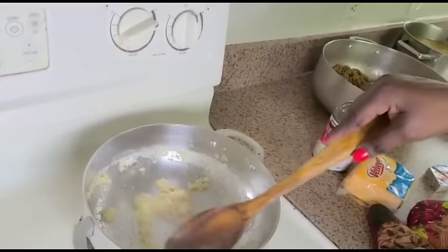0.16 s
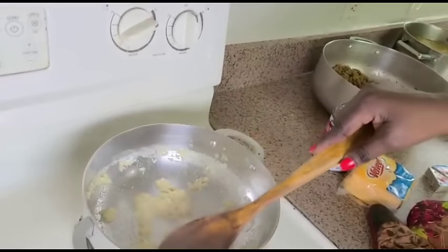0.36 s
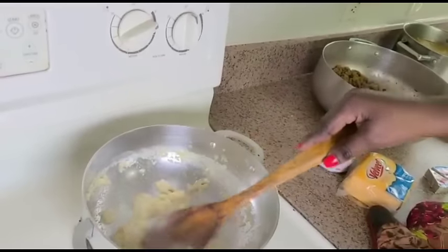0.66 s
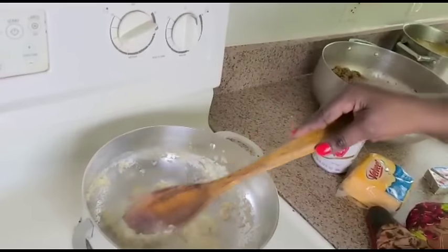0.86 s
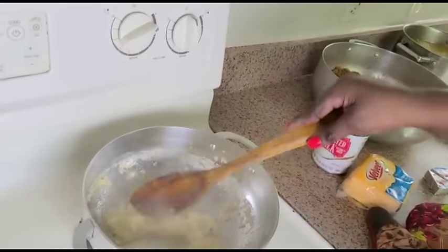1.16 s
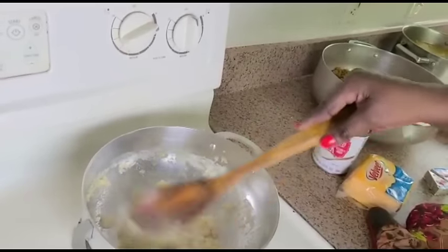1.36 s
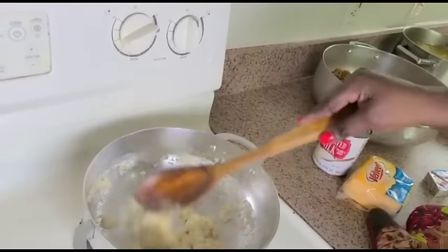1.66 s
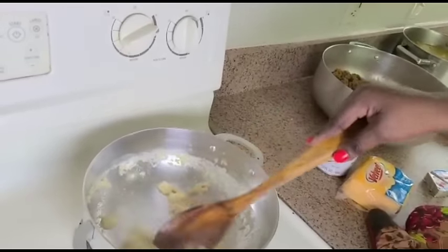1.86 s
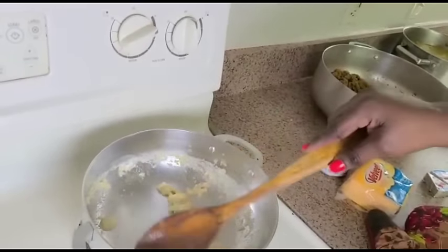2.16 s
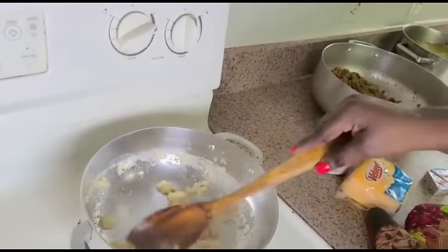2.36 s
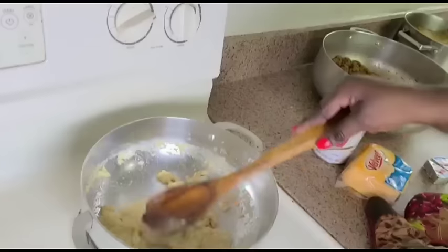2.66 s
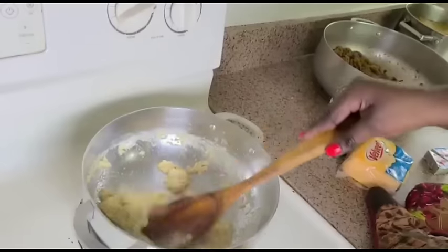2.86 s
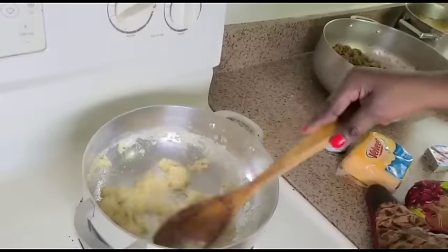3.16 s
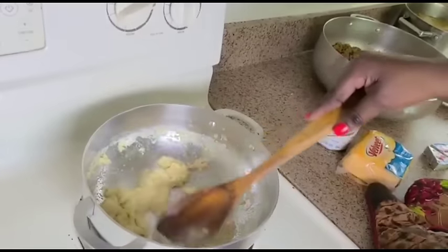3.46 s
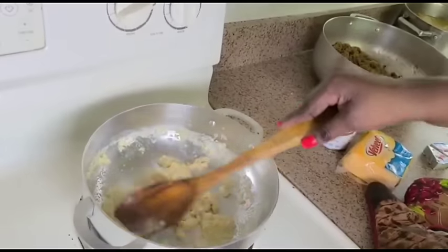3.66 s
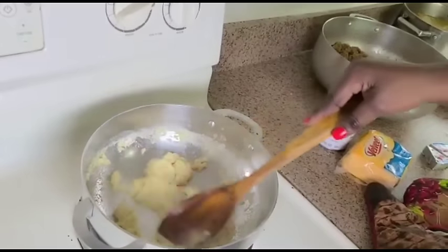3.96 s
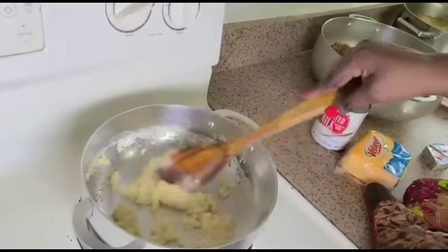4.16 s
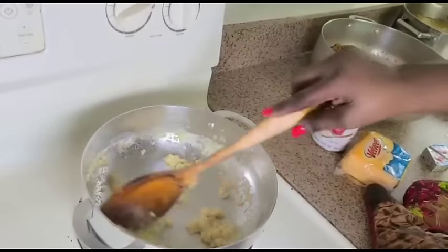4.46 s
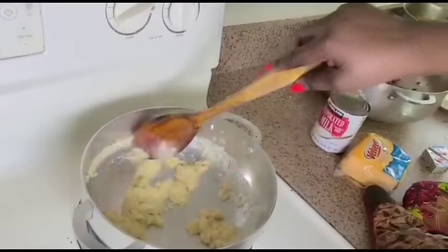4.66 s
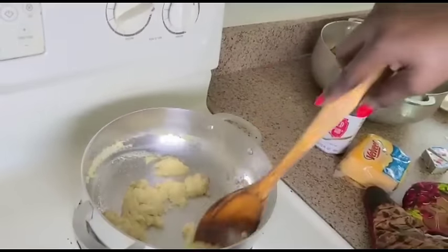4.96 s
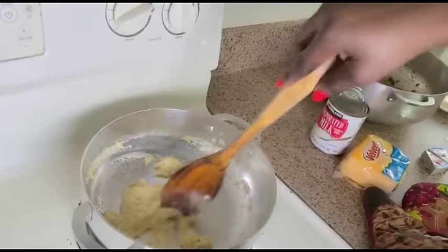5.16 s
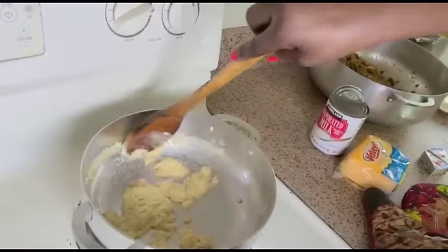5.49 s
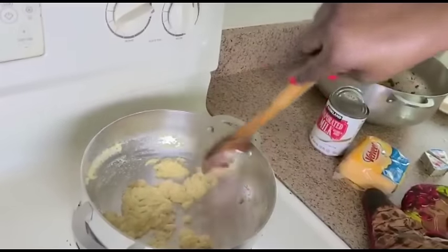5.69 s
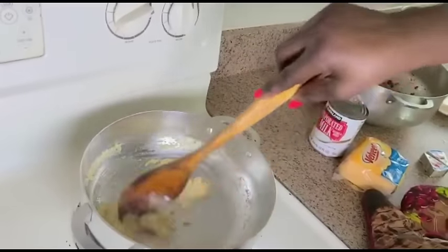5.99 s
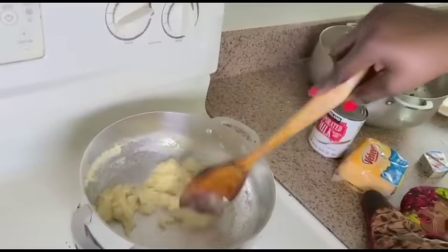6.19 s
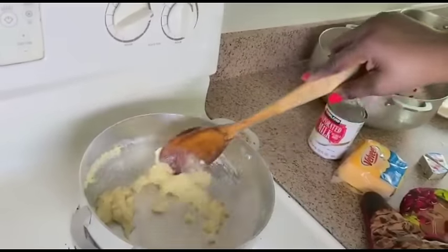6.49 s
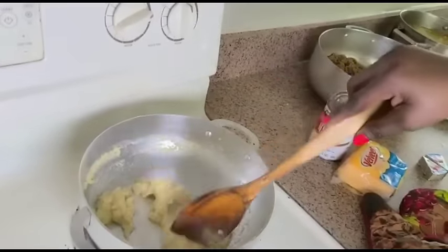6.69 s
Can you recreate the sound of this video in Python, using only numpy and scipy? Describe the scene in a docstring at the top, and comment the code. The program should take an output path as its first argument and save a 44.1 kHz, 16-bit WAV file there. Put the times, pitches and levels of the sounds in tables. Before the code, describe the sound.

From the start, a wooden spoon stirs butter and flour in a metal pot close by. Each stroke scrapes into a dull double knock with a short metallic ring, about three a second, strongest from 1.5 to 3 seconds. The pot clatters on its burner and the stove top gives low thumps, most clearly around 2.7 seconds. Soft rubbing of paste, a faint rumble and a gentle, spitting sizzle continue underneath. From about 3.2 seconds sharper clacks on the pot wall join in, and the sizzle swells and flares with the strokes. After 4.2 seconds the knocks become sparse and light. Hard, ringing clacks land at about 4.9 and 5.3 seconds, and at the second one the sizzle abruptly drops. A few faint taps follow, the sizzle recovers around 6.2 seconds, and one more clack sounds near 6.7 seconds.

```python
"""Stirring butter and flour in a pot

A wooden spoon knocks on the bottom of a metal pot, which clatters on its burner, and clacks on the wall.
Each impact excites the pot's damped modes, and the stove top thumps as the pot rocks.
Bursting bubbles make the fat sizzle and flare with the strokes; its heard level ducks abruptly at a
hard clack, then recovers. Friction adds rubbing and scraping, and the stove rumbles softly below."""
import sys
import numpy as np
from scipy import signal
from scipy.fft import rfft, irfft, next_fast_len
from scipy.io import wavfile
from scipy.ndimage import uniform_filter1d

SR = 44100
rng = np.random.default_rng(int(sys.argv[2]) if len(sys.argv) > 2 else 0)


def log_audio(samples):
    """Write samples as a 16-bit WAV file to the path given in sys.argv[1]."""
    # one column per channel
    frames = np.atleast_2d(samples).T
    # limit to full scale, then quantise
    limited = np.clip(frames, -1, 1)
    pcm = np.round(limited * 32767).astype(np.int16)
    wavfile.write(sys.argv[1], SR, pcm)


N = 301203

# each stroke scrapes, then knocks twice on the bottom: start_s, first_knock_db, gap_s, second_knock_db,
# rise_s, favoured_hz, brightness_db, after_ring_db, scrape_db
STROKES = [(.083, -13.5, 0.0082, -7, 0.00073, 503, -6, -2, -38),
           (.679, -13.5, .032, -13, 0.0027, 382, -7, 0, -34.5),
           (.950, -13, 0.012, -6.5, 0.002, 830, -0.5, -1, -34.5),
           (.996, -16.5, 0.013, -15, 0.0013, 865, 9.5, -6, -29.5),
           (1.210, -16, 0.026, -12, 0.0018, 473, -9, -0.5, -37),
           (1.502, -8.5, .009, -8, 0.00069, 500, -12, 0.5, -32),
           (1.773, -8, .012, -6.5, 0.0025, 750, 3, -4, -34),
           (2.05, -10, 0.0056, -3, 0.0016, 490, 1, -2, -35.5),
           (2.348, -14.5, .008, -23, 0.0012, 486, -19, -0.5, -43),
           (2.629, -8, .011, -10, 0.0021, 1990, -1, -1, -31),
           (2.677, -14, .054, -27, .002, 497, -14, -3.5, -48),
           (2.904, -10, .041, -11.5, 0.0031, 487, 5.5, -1.5, -31),
           (3.116, -13, 0.0067, -14, 0.0019, 460, -15, -2, -44),
           (3.347, -24.5, .028, -21.5, 0.0011, 480, 2.5, 8.5, -36),
           (3.429, -19.5, .012, -20.5, 0.014, 490, -17, 8, -42),
           (3.682, -13.5, 0.023, -13.5, 0.0027, 480, 1.5, 4, -36),
           (4.170, -15.5, .019, -20.5, 0.00098, 480, -5, 1.5, -30),
           (4.854, -20.5, 0.017, -25, 0.0051, 740, -8, 3.5, -42),
           (5.759, -26, 0.023, -21, 0.0044, 440, -4, 3.5, -52),
           (6.005, -24.5, .047, -29, 0.0013, 1980, -4, 6, -54),
           (6.635, -23, 0.017, -36, 0.0088, 472, -1, 8.5, -54)]
# dull clatter of wood, pot and stove top: frequency_hz, density_db
CLATTER_SPECTRUM = [(100, -25), (180, -4.5), (290, -14.5), (400, -3.5), (490, -3), (610, -4), (780, -4.5),
                    (980, -12), (1500, -11), (2050, -6.5), (2600, -13.5), (5000, -17), (7000, -28.5),
                    (15000, -77)]
# resonances of the pot bottom, damped by the paste: centre_hz, width_hz, gain_db
BOTTOM_RESONANCES = [(472, 66, 2.5), (752, 47, 2.5), (842, 25, 8.5), (1144, 140, 6), (1680, 69, 5),
                     (2040, 130, 1.5), (2890, 110, 7)]
# stereo balance of the knocks: frequency_hz, left_minus_right_db
KNOCK_BALANCE = [(200, 2), (480, 0), (800, -3), (1400, -4), (2100, -7.5), (4500, -12)]


def knocks(hit_db=-1.5, hit_t60=0.051, clatter_db=-12, clatter_t60=0.38, ring_db=-17, bright_hz=1800):
    """Cushioned impact: the paste softens each knock; pot, burner and stove top rattle on after it."""
    t = np.arange(SR // 2) / SR
    rattle, ring = np.zeros((2, 2, N))
    mode_hz, bottom_db, _, _ = np.transpose(POT_MODES)
    treble = signal.butter(1, bright_hz, "high", fs=SR)
    for start_s, first_db, gap_s, second_db, rise_s, favoured_hz, bright_db, after_db, _ in STROKES:
        spot = signal.iirpeak(favoured_hz, Q=13.5, fs=SR)  # the spot struck lifts one resonance
        levels_db = ring_db + after_db + bottom_db + bright_db * (mode_hz > bright_hz)
        for knock_s, level_db in (start_s, first_db), (start_s + gap_s, second_db):
            force = from_db(level_db) * onset(t, rise_s)
            hit = noise_burst(t, hit_db, hit_t60, side_db=-25)
            clatter = noise_burst(t, clatter_db + after_db, clatter_t60, side_db=-7)
            knock = band_gain(force * (hit + clatter), treble, bright_db)
            add(rattle, knock_s, band_gain(knock, spot, gain_db=6))
            add(ring, knock_s, force * pot_ring(t, levels_db, uneven_db=4))
    return panned(coloured(rattle, CLATTER_SPECTRUM, BOTTOM_RESONANCES) + ring, KNOCK_BALANCE)


# clacks of the spoon on the wall; the rows at 3.349 s and 5.759 s instead add crack and ring to the knocks # on
# the bottom at those times: start_s, level_db, rise_s, lowest_ring_hz, highest_ring_hz, free_ring_db, crack_db
CLACKS = [(1.387, -28.5, 0.00079, 1200, 2200, -10, 7), (3.231, -18.5, 0.0017, 2050, 2180, -19, 0),
          (3.349, -17, .0005, 1000, 1500, -16, -11), (3.804, -25.5, .0015, 1890, 2900, -1.5, 6),
          (4.909, -14, 0.0035, 880, 3500, -11.5, 8), (4.918, -11, .0011, 1850, 2400, -10, -6.5),
          (5.329, -14.5, 0.00071, 1880, 3900, -5, 5), (5.381, -25, 0.0012, 600, 2300, 1, 4.5),
          (5.759, -34.5, .003, 440, 905, 8, 4), (6.671, -15.5, 0.00085, 1320, 2250, -14, 5)]
# crack of bare wood on metal: frequency_hz, density_db
CRACK_SPECTRUM = [(200, -26), (600, -21), (1000, 3), (1500, -3), (2500, -4.5), (3700, 0.5), (5000, -5.5),
                  (6700, -5), (9000, -21), (15000, -17)]


def clacks(crack_t60=0.045, held_t60=0.065, buzz_t60=0.3, rolloff_db_per_octave=16, pan_db=-1.5):
    """Contact damping: wood cracks on the wall and chokes its ring; a free ring and a buzz linger."""
    t = np.arange(SR // 2) / SR
    crack, ring, buzz = np.zeros((3, 2, N))
    mode_hz, _, wall_db, _ = np.transpose(POT_MODES)
    for start_s, level_db, rise_s, low_hz, high_hz, free_db, crack_db in CLACKS:
        force = from_db(level_db) * onset(t, rise_s)
        # the place struck and the hardness of the contact favour one range of modes
        octaves_outside = np.abs(np.log2(mode_hz / np.clip(mode_hz, low_hz, high_hz)))
        levels_db = wall_db - rolloff_db_per_octave * octaves_outside
        choke = decay(t, held_t60) + from_db(free_db)
        add(ring, start_s, force * choke * pot_ring(t, levels_db, uneven_db=1.3))
        add(crack, start_s, force * noise_burst(t, crack_db - 2, crack_t60, side_db=1.5))
        add(buzz, start_s, force * noise_burst(t, crack_db + free_db - 9, buzz_t60, side_db=1))
    crack = coloured(crack, CRACK_SPECTRUM)
    buzz = coloured(buzz, SCRAPE_SPECTRUM, CAVITY_RESONANCES)
    return (crack + buzz + ring) * from_db([[pan_db], [-pan_db]])


# natural modes of the pot: pitch_hz, bottom_struck_db, wall_struck_db, t60_s
POT_MODES = [(373, -12.5, -27.5, 0.58), (446, -12, -1.5, 0.64), (495, -5.5, -9, 0.34),
             (761.7, 0, -12, 0.24), (842, -12, -2.5, 0.32), (889, -8.5, -15, 0.43), (1037, -7, -27, .26),
             (1136, -10, -19, 0.22), (1241, -7, 1.5, 0.11), (1285, -15, -7, 0.27), (1599, -21, -7, 0.36),
             (1858, -3.5, -2, .14), (2000, 0, -4, 0.17), (2163, -0.5, -4, 0.2), (2232, -21, 2.5, 0.11),
             (2845, -17, -0.5, .1), (4050, -25, -4, 0.055), (4350, -5, -11, 0.17), (5350, -30, -11, .12),
             (6700, -34, -2, 0.087)]


def pot_ring(t, levels_db, uneven_db, ear_phase_rad=0.93):
    """Modal superposition: a blow excites damped sines, each reaching each ear in its own phase."""
    lowest_hz = POT_MODES[0][0]
    ring = 0
    for (pitch_hz, _, _, t60_s), level_db in zip(POT_MODES, levels_db):
        phase_spread = ear_phase_rad * np.sqrt(pitch_hz / lowest_hz) / 2
        phase = np.pi * rng.integers(2) + phase_spread * rng.normal(size=(2, 1))
        strength = from_db(level_db + uneven_db * rng.normal())
        ring = ring + strength * decay(t, t60_s) * np.sin(2 * np.pi * pitch_hz * t + phase)
    return ring


# the pot rocks on the stove top: start_s, level_db, pitch_hz, t60_s
STOVE_THUMPS = [(0.234, -21, 63, 0.45), (.998, -19, 110, 0.065), (1.255, -17, 63.6, 0.34),
                (1.801, -18, 105, 0.11), (2.626, -3.5, 126, 0.034), (2.682, -3.5, 163, 0.02),
                (2.693, -10, 110, .05), (2.731, -15, 100, .05), (2.961, -14, 65.4, 0.28),
                (3.975, -14, 69.6, .18), (4.519, -17.5, 79, .2)]


def thumps(pan_db=-1.5):
    """Damped oscillation: the stove top gives under the pot and swings back."""
    t = np.arange(SR // 4) / SR
    out = np.zeros((2, N))
    for start_s, level_db, pitch_hz, t60_s in STOVE_THUMPS:
        add(out, start_s, -from_db(level_db) * decay(t, t60_s) * np.sin(2 * np.pi * pitch_hz * t))
    return out * from_db([[pan_db], [-pan_db]])


# the heard level of the sizzle builds, ducks abruptly at a hard clack, then recovers:
# time_s, hiss_db, spit_db
SIZZLE_LEVELS = [(0.0, -33, -34), (0.13, -34.5, -33.5), (0.74, -35, -35.5), (1.6, -31, -30.5),
                 (1.77, -25.5, -28.5), (1.82, -32, -33), (2.38, -32, -33), (2.45, -35.5, -35.5),
                 (2.93, -30, -33), (3.06, -34, -35.5), (3.14, -31, -33.5), (3.56, -27, -28),
                 (3.86, -29.5, -30), (3.98, -26, -30.5), (4.89, -25.5, -27.5), (5.21, -28.5, -31.5),
                 (5.32, -28, -30.5), (5.36, -40, -38.5), (5.55, -39.5, -41.5), (6.09, -36.5, -38.5),
                 (6.24, -29.5, -34.5), (6.35, -29, -32.5), (6.72, -30.5, -32.5), (6.83, -26.5, -32)]
# the spoon sweeps fat onto bare hot metal: time_s, level_db
FLARES = [(.05, -34), (.36, -32), (1.42, -31.5), (3.28, -28.5), (3.99, -27), (4.40, -28.5), (4.90, -27.5),
          (6.52, -51)]
# spitting of the larger bubbles: frequency_hz, density_db
SPIT_SPECTRUM = [(500, -22), (950, -20.5), (1250, -6), (1500, -9), (1900, -2), (2500, -3.5), (2900, -0.5),
                 (3300, -1.5), (4600, 1.5), (6000, -1), (7400, -6), (10000, -8.5), (16000, -42)]
# hiss of the finest bubbles: frequency_hz, density_db
HISS_SPECTRUM = [(2000, -42), (5000, -14.5), (6700, -2.5), (7400, -5), (8300, 2), (9050, 1.5),
                 (10000, -0.5), (10900, 2), (12100, -1.5), (13000, -5), (15000, -9), (16000, -28)]
# resonances of the hollow above the fat: centre_hz, width_hz, gain_db
CAVITY_RESONANCES = [(1250, 45, 7.5), (1764, 51, 5.5), (2030, 210, 1.5), (2144, 17, 10.5), (2926, 45, 4),
                     (4590, 68, 3)]
# stereo balance of frying and scraping: frequency_hz, left_minus_right_db
FRY_BALANCE = [(500, -24.5), (1000, -0.5), (2100, -9), (3000, -6.5), (4600, -8), (6000, -5), (7200, 0.5),
               (9000, -3), (11000, -4), (13000, 0)]


def sizzle(flutter_db=0.85, surge_db=1.23):
    """Shot noise: large bubbles spit in the pot's hollow, fine ones hiss; both flare on bared metal."""
    hiss_db, spit_db = curves(SIZZLE_LEVELS)
    spit = crackle(SPIT_SPECTRUM, CAVITY_RESONANCES, rate_hz=7000, spread_db=0)
    hiss = crackle(HISS_SPECTRUM, (), rate_hz=16000, spread_db=1.5)
    sweeps = sum(from_db(db) * swell(time_s, rise_s=0.04, fade_s=0.099) for time_s, db in FLARES)
    flare = sweeps + from_db(-5) * scrape_envelope()
    surge = wander(surge_db, rate_hz=11)
    spit_gain = np.hypot(from_db(spit_db + 2), from_db(-3) * flare) * wander(flutter_db, rate_hz=60)
    hiss_gain = np.hypot(from_db(hiss_db + 0.5), flare) * wander(flutter_db, rate_hz=80)
    return surge * (spit_gain * spit + hiss_gain * hiss)


# how hard the pot is worked, which sets the level of rubbing and rumble: time_s, level_db
EFFORT = [(0, -31.5), (.85, -30.5), (1.3, -29), (2.5, -28), (3.4, -26), (4.6, -28), (5.32, -29.5),
          (5.37, -36), (5.9, -38), (6.4, -35), (6.83, -31)]
# soft paste dragged over the bottom: frequency_hz, density_db
PASTE_SPECTRUM = [(60, -0.5), (110, -2.5), (155, 4), (200, 1.5), (260, -1.5), (350, 2), (420, -4), (490, 0),
                  (600, -8.5), (830, -6), (1000, -10), (2500, -13), (8000, -48)]
# the spoon's edge on metal: frequency_hz, density_db
SCRAPE_SPECTRUM = [(600, -25), (1000, -7), (1250, -4.5), (1500, -6.5), (1900, 0.5), (2150, -2), (2500, 0),
                   (2900, -2.5), (3400, -20.5), (4600, -13), (6500, -17), (15000, -35.5)]


def rubbing(rub_db=-9, smear_db=-25, lumpy_db=3, drag_db=-15, scrape_db=-1.5, catch_db=1.5):
    """Friction: the spoon drags paste and its edge sticks and slips, swelling with each stroke."""
    effort_db, = curves(EFFORT)
    smear = 0  # the paste is smeared out just after the knock
    for start_s, first_db, _, second_db, *_ in STROKES:
        strength = from_db(max(first_db, second_db) + smear_db)
        smear = smear + strength * swell(start_s + 0.02, rise_s=0.01, fade_s=0.24)
    paste_gain = np.hypot(from_db(effort_db + rub_db), smear)
    slip_gain = np.hypot(from_db(effort_db + drag_db), from_db(scrape_db) * scrape_envelope())
    paste = paste_gain * unit_rms(coloured(stereo_noise(side_db=-18), PASTE_SPECTRUM))
    slips = slip_gain * crackle(SCRAPE_SPECTRUM, CAVITY_RESONANCES, rate_hz=2500, spread_db=2.5)
    return paste * wander(lumpy_db, rate_hz=25) + slips * wander(catch_db, rate_hz=31)


def scrape_envelope():
    """Incoherent addition: the scrapes, each swelling into its knock, sum in power."""
    scrapes = (from_db(db) * swell(start_s, rise_s=0.045, fade_s=0.099) for start_s, *_, db in STROKES)
    return np.sqrt(sum(scrape ** 2 for scrape in scrapes))


# drone of the stove under the pot: frequency_hz, density_db
RUMBLE_SPECTRUM = [(15, -26), (30, -15), (45, -17.5), (55, -6.5), (63, 4), (71, -6.5), (82, -2), (95, -9.5),
                   (113, -6.5), (135, -29.5), (152, -21), (300, -46.5), (1000, -57)]


def rumble(steady_s=0.19, waver_db=1):
    """Amplitude modulation: the stove's low noise follows the stirring effort and wavers."""
    effort_db, = curves(EFFORT)
    drone = coloured(stereo_noise(side_db=-16), RUMBLE_SPECTRUM)
    running_power = uniform_filter1d(drone.mean(axis=0) ** 2, int(steady_s * SR))
    steady_drone = drone / np.sqrt(running_power + 1e-9)
    return from_db(effort_db) * wander(waver_db, rate_hz=14) * steady_drone


def crackle(spectrum, resonances, rate_hz, spread_db, direct_db=-9):
    """Poisson process: filtered clicks, some direct to both ears, the rest scattered by the pot."""
    sizes = from_db(spread_db * np.minimum(rng.exponential(1, (3, N)), 5))
    signs = rng.choice([-1, 1], (3, N))
    left, right, both = sizes * signs * (rng.random((3, N)) < rate_hz / SR)
    clicks = np.array([left, right]) + from_db(direct_db) * both
    return unit_rms(panned(coloured(clicks, spectrum, resonances), FRY_BALANCE))


def stereo_noise(side_db, size=N):
    """Partial coherence: white noise that the two ears partly share."""
    mid, side = rng.standard_normal((2, size))
    return mid + from_db(side_db) * side * np.array([[1], [-1]])


def noise_burst(t, level_db, t60_s, side_db):
    """Broadband transient: stereo noise that dies away."""
    return from_db(level_db) * decay(t, t60_s) * stereo_noise(side_db, len(t))


def onset(t, rise_s):
    """Finite contact time: the force takes hold gradually."""
    return (1 - np.exp(-t / rise_s)) ** 2


def decay(t, t60_s):
    """Exponential decay: 60 dB lost in t60_s."""
    return from_db(-60 * t / t60_s)


def swell(time_s, rise_s, fade_s):
    """Envelope that peaks rise_s before time_s and then dies away."""
    t = np.arange(N) / SR - time_s
    return np.interp(t, [-2 * rise_s, -rise_s, 0, fade_s, 2 * fade_s], [0, 0.96, 0.76, 0.029, 0.013])


def wander(spread_db, rate_hz):
    """Random modulation: a gain that glides between chance levels."""
    levels_db = spread_db * rng.standard_normal(4096)
    return from_db(np.interp(np.arange(N) / SR * rate_hz, np.arange(len(levels_db)), levels_db))


def coloured(x, spectrum, resonances=()):
    """Minimum-phase filter with this spectrum and these resonances; white noise keeps its power."""
    size = 2 * next_fast_len(N // 2 + 4096)
    hz = np.arange(size // 2 + 1) * SR / size
    peaks_db = sum(db / (1 + (2 * (hz - centre) / width) ** 2) for centre, width, db in resonances)
    gain = from_db(at_hz(spectrum, hz) + peaks_db)
    cepstrum = irfft(np.log(gain / np.sqrt(np.mean(gain ** 2))))
    cepstrum[1:size // 2] *= 2  # folding onto positive time makes the filter causal
    response = np.exp(rfft(cepstrum[:size // 2], size))
    return irfft(rfft(x, size) * response)[..., :N]


def band_gain(x, band, gain_db):
    """Parallel equaliser: raise or lower the part that passes a filter."""
    return x + (from_db(gain_db) - 1) * signal.lfilter(*band, x)


def panned(x, balance):
    """Interaural level difference, varying with frequency."""
    size = next_fast_len(N + 1024)
    tilt_db = at_hz(balance, np.arange(size // 2 + 1) * SR / size) / 2
    return irfft(rfft(x, size) * from_db([tilt_db, -tilt_db]), size)[:, :N]


def from_left(x, lag_s):
    """Interaural time difference: the right ear hears the sound later."""
    right = np.pad(x[1], (round(lag_s * SR), 0))[:N]
    return np.array([x[0], right])


def from_db(db):
    """Decibels to amplitude ratio."""
    return 10 ** (np.asarray(db) / 20)


def unit_rms(x):
    """Scale a stereo pair so that its mid has rms 1."""
    return x / np.sqrt(np.mean(x.mean(axis=0) ** 2) + 1e-20)


def curves(rows):
    """Interpolate each column of a timed table at every sample."""
    times_s, *columns = np.transpose(rows)
    return [np.interp(np.arange(N) / SR, times_s, column) for column in columns]


def at_hz(spectrum, hz):
    """Interpolate a spectrum on a log-frequency axis."""
    points_hz, levels_db = np.transpose(spectrum)
    return np.interp(np.log(hz + 1), np.log(points_hz), levels_db)


def add(out, start_s, sound):
    """Superpose a sound from start_s on."""
    i = int(start_s * SR)
    out[:, i:i + sound.shape[-1]] += sound[..., :N - i]


def scene():
    """Superposition: spoon, pot and fat close by, over the low sounds of the stove."""
    impacts = from_left(knocks() + clacks(), lag_s=0.00007)
    frying = from_left(sizzle() + rubbing(), lag_s=0.00018)
    return impacts + frying + thumps() + rumble()


def record(dry, low_cut_hz=24.5, high_cut_hz=15500):
    """Band limiting: the deepest bass rolls off, peaks clip at full scale, the top is cut."""
    high_pass = signal.butter(2, low_cut_hz, "high", fs=SR, output="sos")
    low_pass = signal.ellip(10, 0.1, 90, high_cut_hz, fs=SR, output="sos")
    clipped = np.clip(signal.sosfilt(high_pass, dry), -1, 1)
    return signal.sosfilt(low_pass, clipped)


dry = scene()
out = record(dry)
log_audio(out)
```